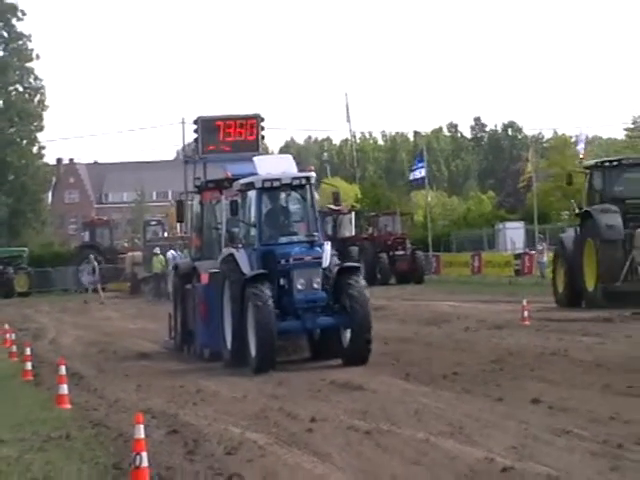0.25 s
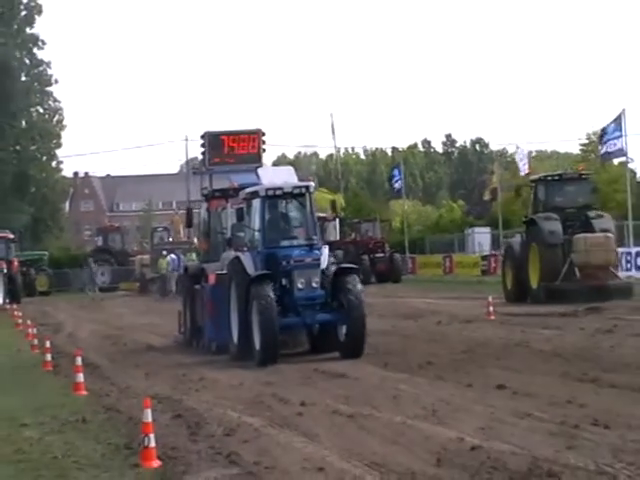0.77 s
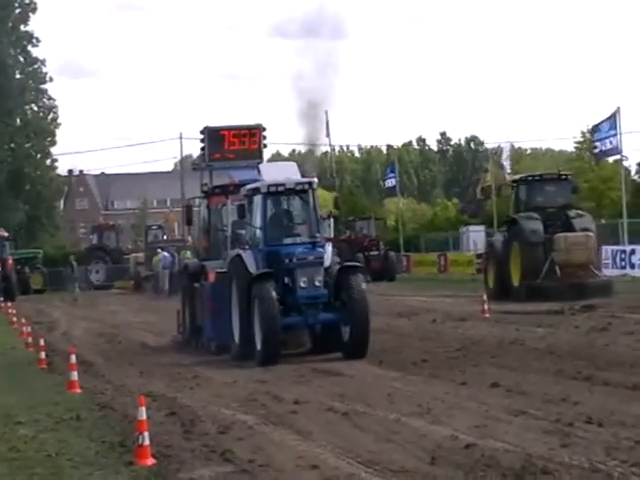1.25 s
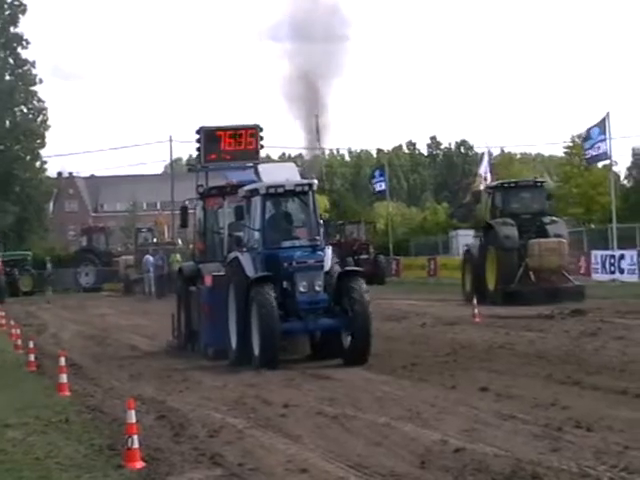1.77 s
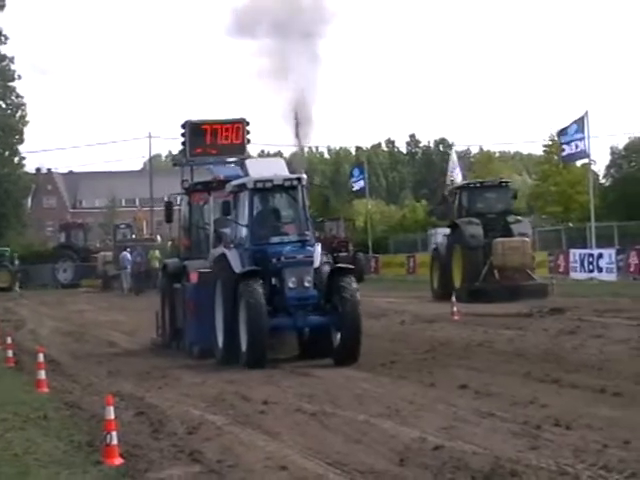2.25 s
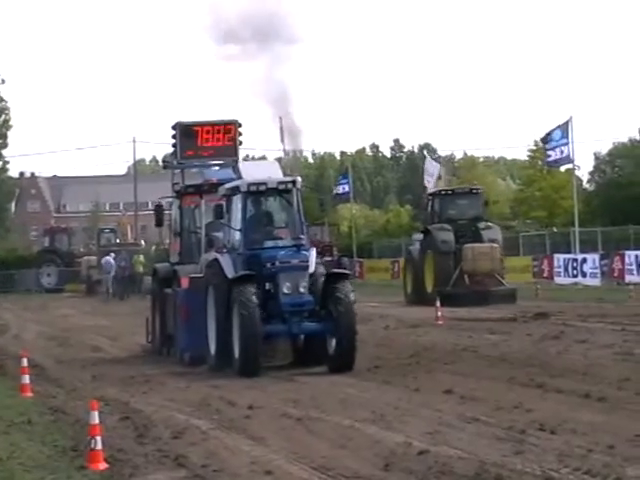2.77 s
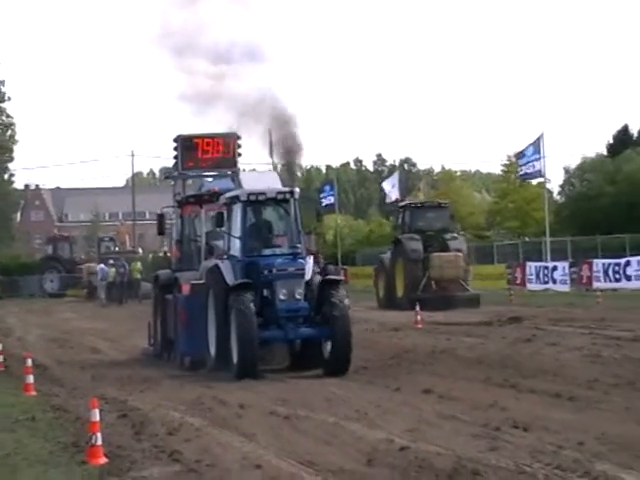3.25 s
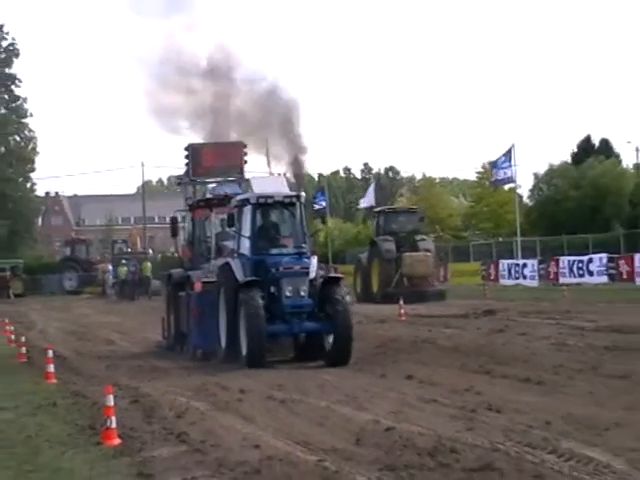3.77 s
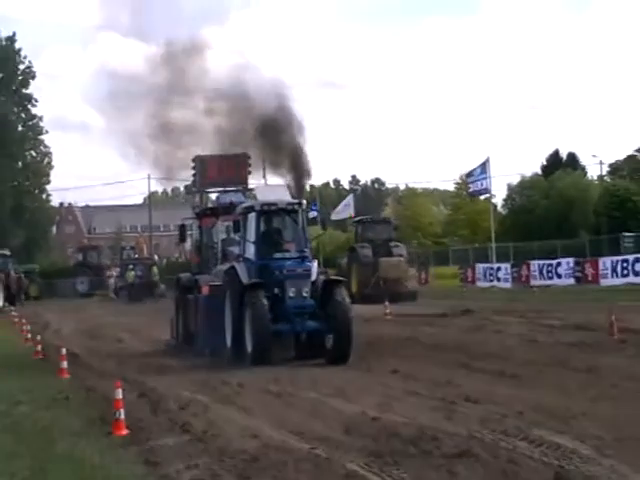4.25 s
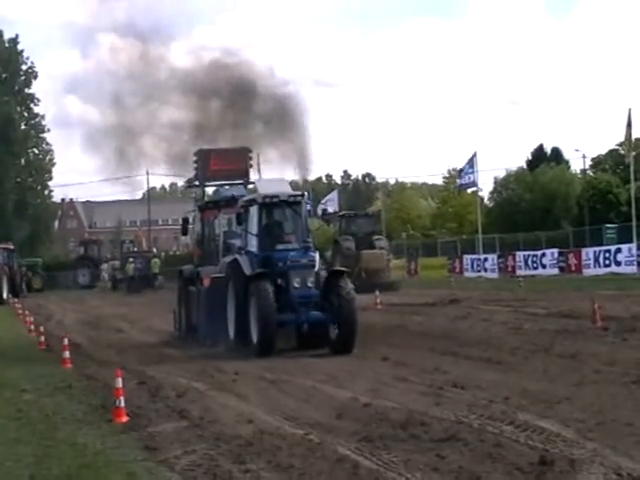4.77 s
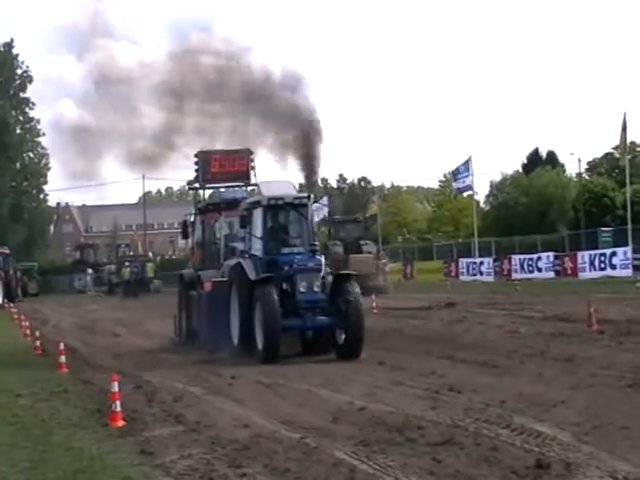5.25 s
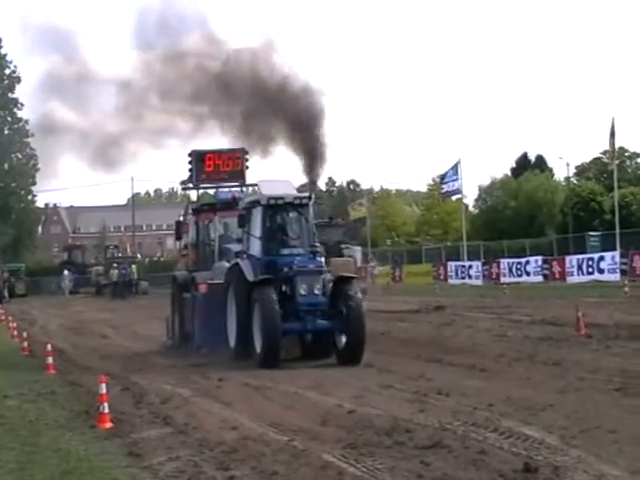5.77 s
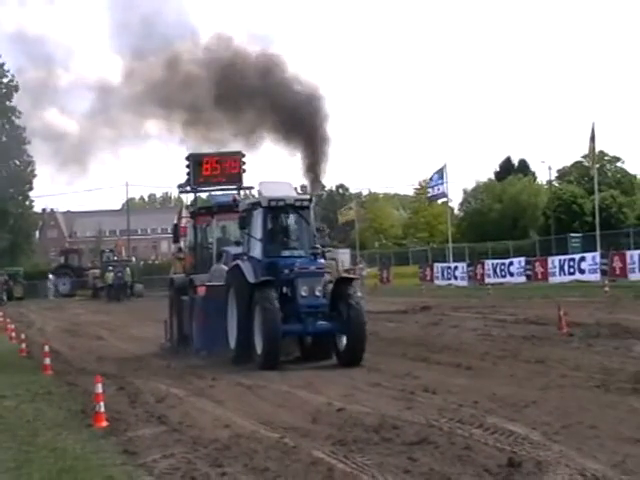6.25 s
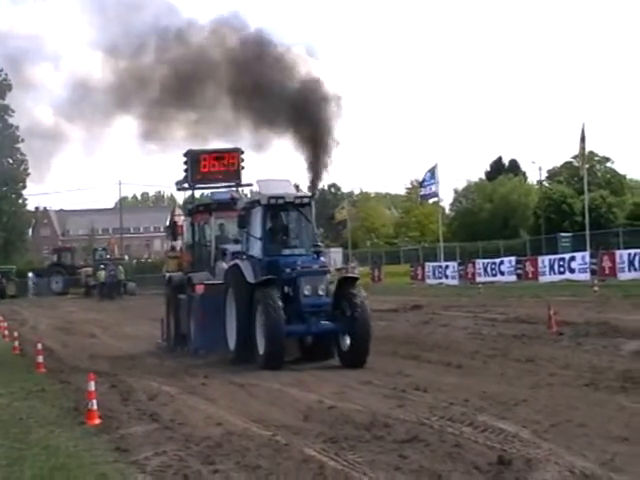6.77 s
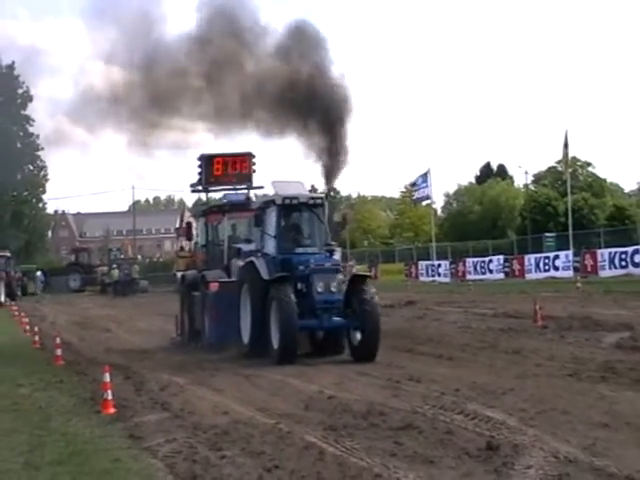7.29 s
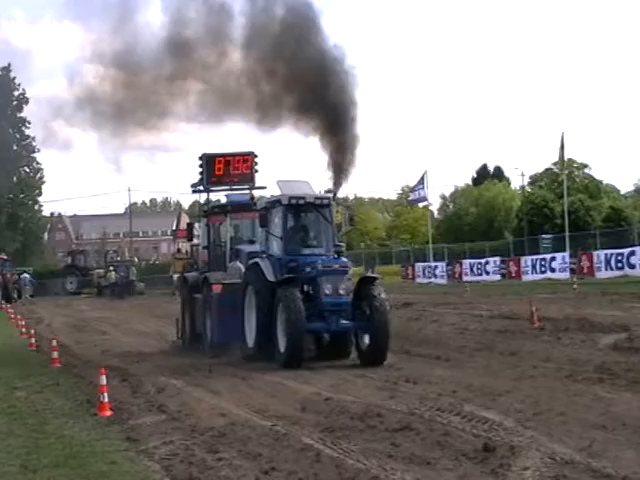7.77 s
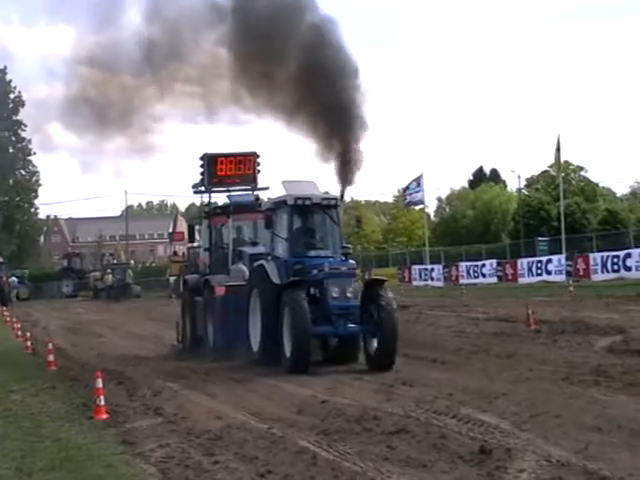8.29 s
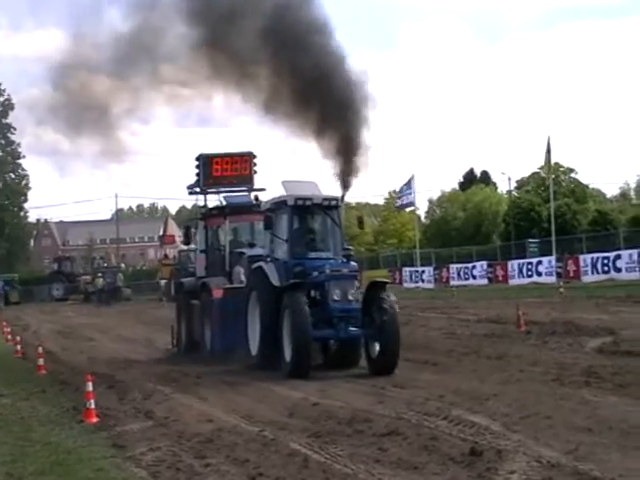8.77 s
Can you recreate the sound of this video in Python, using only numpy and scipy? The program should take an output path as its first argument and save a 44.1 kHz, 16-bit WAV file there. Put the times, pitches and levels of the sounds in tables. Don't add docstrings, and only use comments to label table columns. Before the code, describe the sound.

A tractor's diesel engine roars at full speed outdoors, clattering loudly under a heavy pull, then gradually sinks into a deep, labouring growl.

```python
import sys
import numpy as np
from scipy import signal
from scipy.io import wavfile
from scipy.ndimage import uniform_filter1d, map_coordinates

SR = 44100
rng = np.random.default_rng(int(sys.argv[2]) if len(sys.argv) > 2 else 0)


def volts_from_decibels(level):
    exponent = np.asarray(level, float) / 20
    return 10 ** exponent


def dump(signal):
    limited = np.clip(np.atleast_2d(signal).T, -1, 1)
    pcm = np.round(limited * 32767).astype(np.int16)
    wavfile.write(sys.argv[1], SR, pcm)


N = 398223

# time in seconds, four-stroke cycles per second, ground echo delay in ms.
MOTION = [(0.0, 21.925, 0.437), (0.3, 22.026, 0.449), (1.2, 21.63, 0.449), (2.4, 21.699, 0.463),
          (3.0, 21.651, 0.497), (3.3, 21.341, 0.532), (3.6, 21.575, 0.561), (4.2, 21.188, 0.592),
          (4.5, 21.615, 0.589), (5.1, 21.492, 0.579), (5.7, 20.579, 0.608), (6.3, 20.136, 0.651),
          (7.2, 19.202, 0.688), (7.5, 18.795, 0.686), (8.1, 18.362, 0.682), (9.03, 17.166, 0.712)]
# time in seconds, engine level in dB, rattle in dB (a jolt brightens the block).
LOAD = [(0, -17.5, 0.2), (.8, -17, 1.3), (1.6, -18, 0.4), (2.7, -17.5, -.6), (3.25, -18, 1.5),
        (3.8, -18, -0.5), (4.5, -17, -2), (4.8, -17, 2), (5.2, -17.5, -3.5), (5.8, -18.5, 1),
        (6.4, -18, -3.5), (7.0, -17.5, 0.2), (7.6, -17, -0.8), (8.1, -17, -1.7), (8.4, -18, -0.3),
        (9.03, -19, 4)]
# place in the cycle from 0 to 1, block knock in dB, upper knock in dB,
# clatter in dB.
CYLINDERS = [
    (0.074, -4.5, -6, -2),
    (0.244, -5.5, -5.5, -5.5),
    (.415, -4, -0.5, -2.5),
    (.58, -9, -6.5, -10.5),
    (.75, 2.36, 0.5, -2),
    (.905, -6.5, -9, -12),
]
# time in seconds, peak level in dB.
HARD_KNOCKS = [(0.901, 0), (1.13, 0), (2.008, -3), (3.115, -1), (3.582, 2), (4.563, 1.5), (5.073, 2),
               (5.26, 0), (5.307, 1), (5.354, -0.5), (5.403, 1.5), (5.546, 1.5), (5.643, -1.5),
               (5.838, -1.5), (5.887, -1.5), (6.181, -1), (6.43, 0), (6.987, -1), (7.039, -2.5),
               (7.672, -2.5), (7.833, -5), (8.158, -6), (8.323, -4), (8.491, -3), (8.603, -3.5),
               (8.716, -4.5), (8.774, -5), (8.832, -4), (8.888, -2), (9.004, -2)]
# lead in seconds, rise in seconds, fall in seconds,
# chance spread in dB, share of a hard knock as a ratio, trim in dB, weight of the bare blow as a ratio.
BURSTS = [(0.001176, 0.000079, 0.0023, 1.7, 0.9, 0.1, 9.0),
          (0.0007, 0.00026, 0.0027, 1.9, 0.8, -1.5, 8.0),
          (0.0004, 0.00043, 0.002, 2.8, 0.6, 0.1, 6.0)]
# multiple of the engine cycle, level at full speed in dB, level lugged down in dB.
EXHAUST_LINES = [(3, -26.5, -33), (4, -33, -40), (5, -46, -42), (6, -2, -0.5), (7, -6.5, -16),
                 (8, -9.5, -18), (9, 0, -4.5), (10, -11.5, -20), (11.2, -19, -15), (12.2, -16.5, -5.5),
                 (13, -16, -40), (14, -12, -28), (15, -8, -15.5), (16, -7.5, -11), (18, -25, -15),
                 (19, -24.5, -22), (20, -14, -33), (24, -18.5, -17), (26, -16, -21), (27, -18.5, -18),
                 (28, -17, -21), (30, -14, -6.5)]
# time in seconds, teeth meshed per engine cycle.
GEAR_TEETH = [(0, 18.1), (3.3, 18.2), (4.4, 19.3), (5.1, 19.55), (5.75, 22.1), (9.03, 22.4)]
# frequency in Hz, level in dB per Hz.
BODY_TONE = [(18, -64), (30, -39), (75, -11), (120, -8), (193, 0.5), (244, -5.5), (334, -9), (371, -20),
             (470, -5.5), (1060, -4.5), (1450, -1), (2200, -6.5), (7750, -18.5), (11800, -31.5),
             (15700, -55)]
# frequency in Hz, width in Hz, lift in dB.
PANELS = [(900, 87, 5), (1044, 98, 5.5), (1248, 127, 6), (1580, 42, -1.5), (1610, 21, 4), (1830, 72, -8),
          (2133, 82, 3), (3160, 69, 2)]
# frequency in Hz, left minus right in dB.
LEAN = [(60, -11), (200, -5), (400, 4.5), (900, -0.1), (1500, .2), (2800, -4), (5500, -1.5), (10000, -.4),
        (15000, -6)]
# frequency in Hz, level in dB.
SPREAD = [(40, -14), (100, -28), (300, -23), (1000, -14.5), (2500, -8.5), (6000, -13.5), (14000, -10)]

FREE_SPEED_HZ, LUG_SPAN_HZ = 21.9, 5.4
MID_DELAY_MS = 0.6
BLOCK_DB, UPPER_DB, CLATTER_DB = 22, 23.5, 23
BLOCK_NEAR_DB, UPPER_NEAR_DB = 3.5, -6.5
UPPER_LUG_DB, CLATTER_LUG_DB, UPPER_RATTLE = 2, 1.5, 0.25
DRONE_DB, DRONE_NEAR_DB, DRONE_LUG_DB = -8, -9.5, 2.5
RUMBLE_DB, RUMBLE_NEAR_DB, RUMBLE_GUST_DB = 3.5, -19.5, 3.0
KNOCK_DB, KNOCK_LUG_DB = 6, 9
INTAKE_DB, INTAKE_FACING_DB, INTAKE_TURN_S = -40.5, 15.5, 2.9
BONNET_HZ, BONNET_WIDTH_HZ, BONNET_GAIN, BONNET_TURN_S = 1717, 280, 0.67, 3
ECHO_CUT_HZ = 12000
ECHO_SHARE, ECHO_NEAR_SHARE, ECHO_MOST = 0.7, 2.27, 0.52
PHASE_SCATTER = 0.008
GEAR_DB, GEAR_FADE_DB_PER_S = -37.5, 1.2
CRACKLE_POWER = 1.63


def rms_one(x):
    return x / np.sqrt(np.mean(x ** 2) + 1e-20)


def in_time(rows):
    s, *columns = np.transpose(rows)
    return [np.interp(np.arange(N) / SR, s, c) for c in columns]


def at_hz(points, hz):
    point_hz, db = np.transpose(points)
    return np.interp(np.log(hz), np.log(point_hz), db)


def drift(rate_hz):
    r = np.exp(-2 * np.pi * rate_hz * 40 / SR)
    noise = rng.standard_normal(N // 40 + 2002)
    slow = signal.lfilter([1], [1, -2 * r, r * r], noise)[2000:]
    return np.interp(np.arange(N) / 40, np.arange(len(slow)), rms_one(slow))


def intake():
    band = signal.butter(3, [3850, 4600], "band", fs=SR, output="sos")
    hiss = rms_one(signal.sosfilt(band, rng.standard_normal(N)))
    facing = np.exp(-np.arange(N) / SR / INTAKE_TURN_S)
    return volts_from_decibels(INTAKE_DB + INTAKE_FACING_DB * facing + 1.06 * drift(9.0)) * hiss


def gear(speed):
    turns = np.cumsum(speed * in_time(GEAR_TEETH)[0]) / SR
    db = GEAR_DB - GEAR_FADE_DB_PER_S * np.arange(N) / SR + 2 * drift(1.3)
    return volts_from_decibels(db) * np.sin(2 * np.pi * turns)


def exhaust(cycles, lugged, drone_db):
    out = np.zeros(N)
    for multiple, fast_db, slow_db in EXHAUST_LINES:
        db = fast_db + (slow_db - fast_db) * lugged + 1.1 * drift(1.6)
        offset = PHASE_SCATTER * multiple * rng.standard_normal()
        waver = 0.0028 * multiple * drift(1.6)
        out += volts_from_decibels(db) * np.cos(2 * np.pi * (round(multiple) * cycles + offset + waver))
    return volts_from_decibels(drone_db - 1.5) * out


def panels(x):
    for hz, width_hz, db in PANELS:
        r = np.exp(-np.pi * width_hz / SR)
        feedback = [1, -2 * r * np.cos(2 * np.pi * hz / SR), r * r]
        ring = signal.lfilter([(1 - r * r) / 2, 0, (r * r - 1) / 2], feedback, x)
        x = x + (volts_from_decibels(db) - 1) * ring
    return x


def knocks(cycles, knock_db):
    place, *pattern_db = np.transpose(CYLINDERS)
    turns = (np.arange(int(cycles[-1]))[:, None] + place).ravel()
    chance = np.clip(rng.standard_normal((len(turns), 5)), -2, 1.7)
    at = np.interp(turns + 0.005 * chance[:, 0], cycles, np.arange(N))

    hard_s, hard_db = np.transpose(HARD_KNOCKS)
    hard = np.abs(at / SR - hard_s[:, None]).argmin(axis=1)
    at[hard] = (hard_s + 0.0006) * SR

    blows, bursts = np.full((3, N), 1e-18), []
    for k, (lead_s, rise_s, fall_s, chance_db, hard_share, trim_db, _) in enumerate(BURSTS):
        db = np.resize(pattern_db[k], len(turns)) + 0.8 * chance[:, 1] + chance_db * chance[:, 2 + k]
        db[hard] = 0.52 * db[hard] + hard_share * (hard_db + 5.0)
        start = np.clip(at - lead_s * SR, 0, N - 1).astype(int)
        blows[k, start] = volts_from_decibels(db + knock_db[start] + trim_db)
        up, down = np.exp(-1 / (rise_s * SR)), np.exp(-1 / (fall_s * SR))
        fall = signal.lfilter([1], [1, -down], blows[k])
        rise = signal.lfilter([1], [1, -up], blows[k])
        bursts.append(fall - rise)
    return blows, np.array(bursts)


def block(cycles, levels_db, rumble_db, knock_db, nearness):
    white = rng.standard_normal((3, N))
    blows, bursts = knocks(cycles, knock_db)
    blows = blows * np.array([[row[-1]] for row in BURSTS])
    gates = np.sqrt(1 + 3.44 * bursts ** 2)
    gates = np.vstack([gates, gates[2] ** CRACKLE_POWER])
    blows = blows[[0, 1, 2, 2]]
    even = np.sqrt(uniform_filter1d(gates ** 2 + blows ** 2, size=SR // 4, axis=1))

    edges = 30 * 2 ** np.arange(0, 9.3, 0.4)
    surge = drift(7.0)
    out = np.zeros((3, N))
    for k, (low, high) in enumerate(zip(edges, edges[1:])):
        hz = np.sqrt(low * high)
        part = np.searchsorted([1600, 4500, 8000], hz)
        drive, level_db = white[[k % 2, 2]], rumble_db
        if hz > 400:
            blow = (-1) ** k * blows[part] * [[1], [0]]
            drive = (drive * gates[part] + blow) / even[part]
            level_db = levels_db[min(part, 2)]
        band = signal.butter(2, [low, high], "band", fs=SR, output="sos")
        direct, scattered = signal.sosfilt(band, drive)
        air_db = 19.0 * nearness * (hz / 12000) ** 2
        sway_db = (0.33, 0.6, 0.84, 0.8)[part] * surge + drift(15.4)
        gain = volts_from_decibels(at_hz(BODY_TONE, hz) + level_db + air_db + sway_db)
        lean = volts_from_decibels(at_hz(LEAN, hz))
        side = (lean - 1) / (lean + 1) * direct
        out += gain * np.array([direct, side, volts_from_decibels(at_hz(SPREAD, hz)) * scattered])
    return panels(out)


def bonnet(x):
    edges = [BONNET_HZ - BONNET_WIDTH_HZ / 2, BONNET_HZ + BONNET_WIDTH_HZ / 2]
    band = signal.butter(2, edges, "band", fs=SR, output="sos")
    facing = np.exp(-(np.arange(N) / SR / BONNET_TURN_S) ** 2)
    return x + BONNET_GAIN * facing * signal.sosfilt(band, x)


def ground_echo(x, delay_ms):
    late = np.arange(N) - delay_ms * SR / 1000
    dull = signal.sosfilt(signal.butter(1, ECHO_CUT_HZ, fs=SR, output="sos"), x)
    echo = np.array([map_coordinates(c, [late + 0.4], order=3, mode="nearest") for c in dull])
    share = ECHO_SHARE + ECHO_NEAR_SHARE * (delay_ms - MID_DELAY_MS)
    return x - np.minimum(share, ECHO_MOST) * echo


def scene():
    speed, delay_ms = in_time(MOTION)
    load_db, rattle_db = in_time(LOAD)
    cycles = np.cumsum(speed) / SR
    near = delay_ms - MID_DELAY_MS
    lugged = np.clip((FREE_SPEED_HZ - speed) / LUG_SPAN_HZ, 0, 1.2)

    drone_db = load_db + DRONE_DB + DRONE_NEAR_DB * near + DRONE_LUG_DB * lugged
    tones = intake() + gear(speed) + exhaust(cycles, lugged, drone_db)

    block_db = load_db + BLOCK_DB + BLOCK_NEAR_DB * near
    upper_db = load_db + UPPER_DB + UPPER_NEAR_DB * near + UPPER_LUG_DB * lugged + UPPER_RATTLE * rattle_db
    clatter_db = load_db + CLATTER_DB + CLATTER_LUG_DB * lugged + rattle_db
    rumble_db = RUMBLE_DB + RUMBLE_NEAR_DB * near + RUMBLE_GUST_DB * drift(1.4)
    knock_db = KNOCK_DB + KNOCK_LUG_DB * lugged
    body = block(cycles, [block_db, upper_db, clatter_db], rumble_db, knock_db, near)
    mid, side, scattered = volts_from_decibels(-13.0) * ground_echo(bonnet(body), delay_ms)

    return mid + (side + scattered) * [[1], [-1]] + tones * volts_from_decibels(np.array([[-1.4], [1.2]]))


def band_limit(x):
    return signal.sosfilt(signal.butter(12, 15850, fs=SR, output="sos"), x)


def record(dry):
    rounded = 1.1 * np.tanh(dry / 1.1)
    return band_limit(rounded)


dry = scene()
out = record(dry)
dump(out)
```